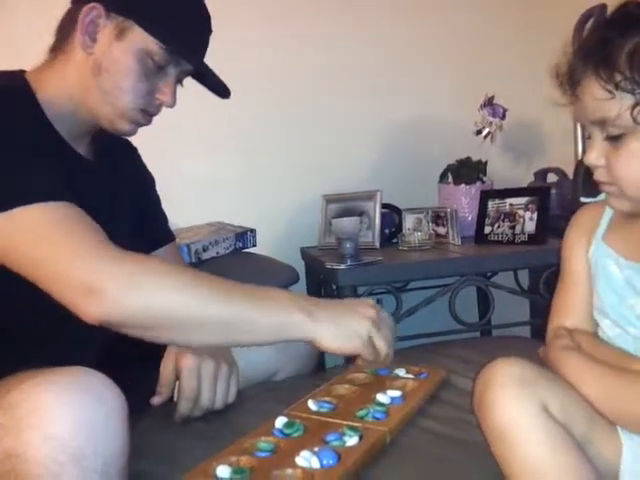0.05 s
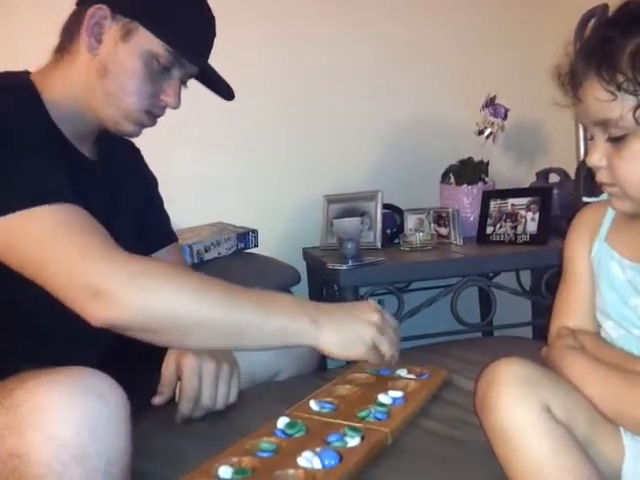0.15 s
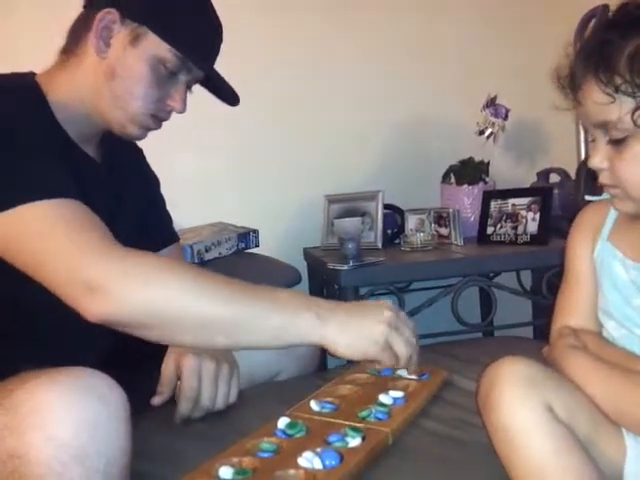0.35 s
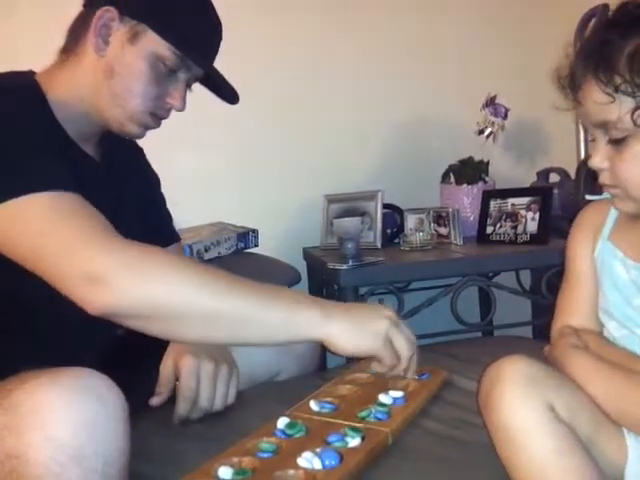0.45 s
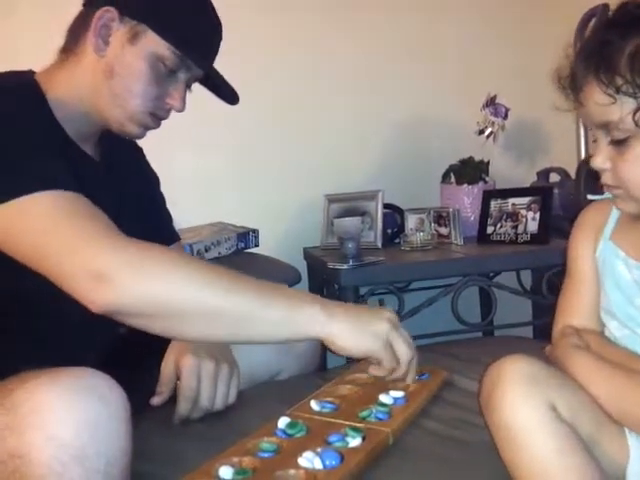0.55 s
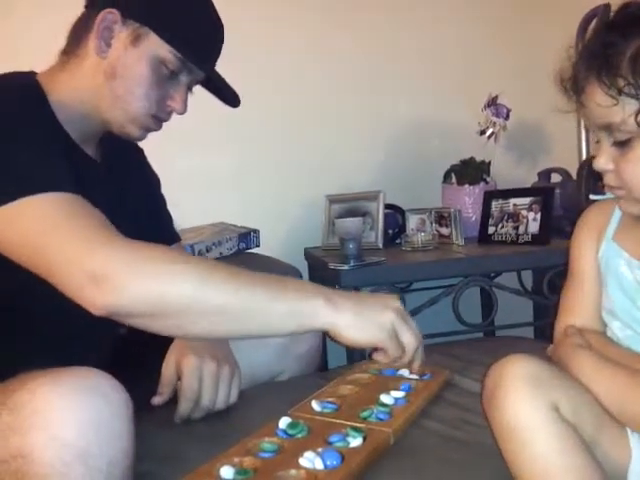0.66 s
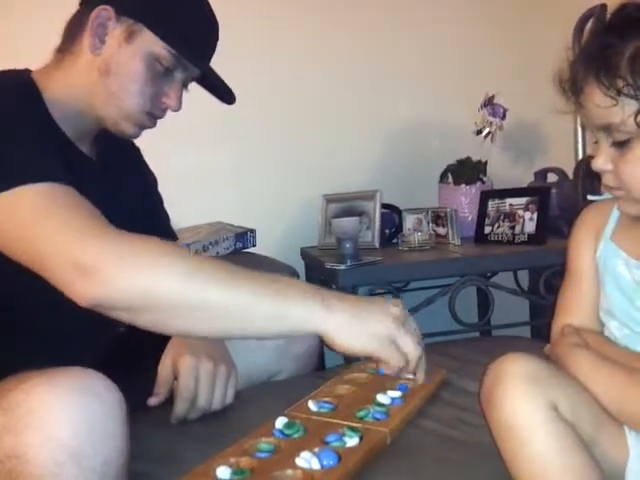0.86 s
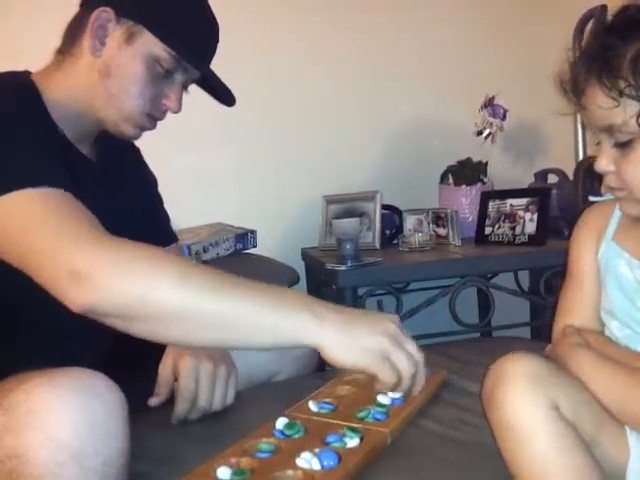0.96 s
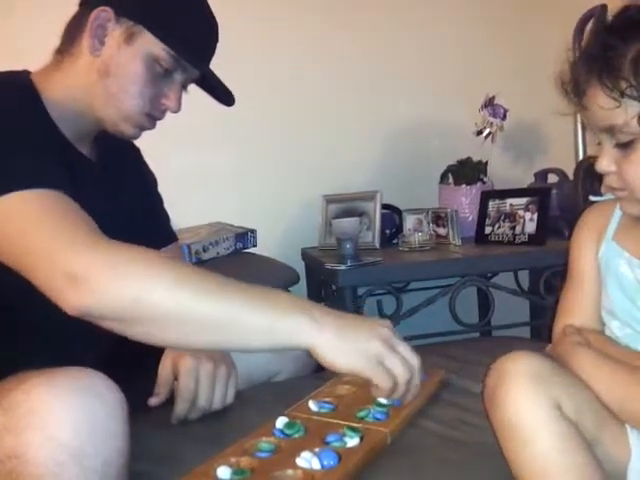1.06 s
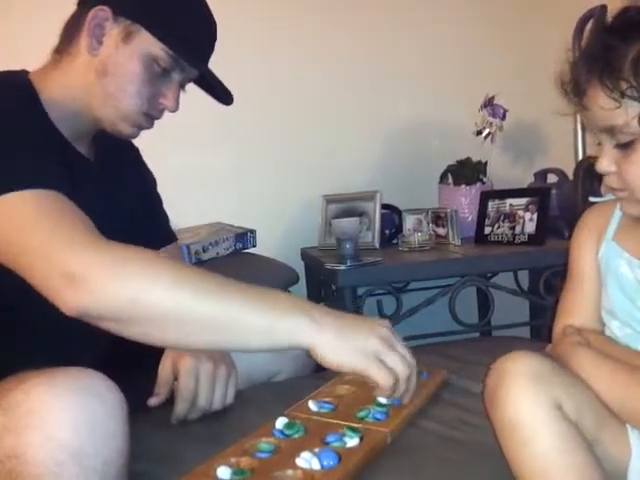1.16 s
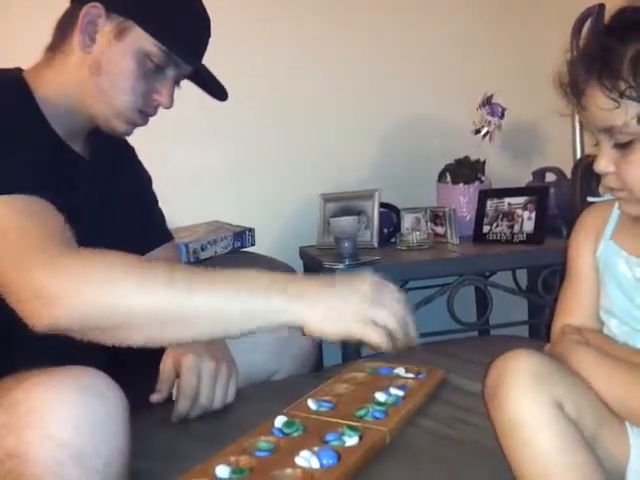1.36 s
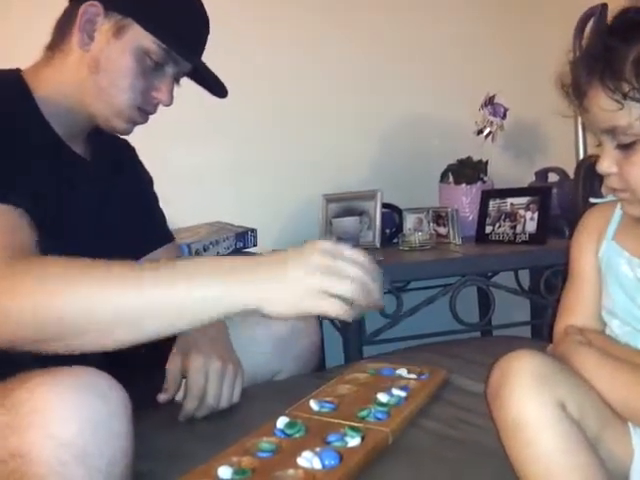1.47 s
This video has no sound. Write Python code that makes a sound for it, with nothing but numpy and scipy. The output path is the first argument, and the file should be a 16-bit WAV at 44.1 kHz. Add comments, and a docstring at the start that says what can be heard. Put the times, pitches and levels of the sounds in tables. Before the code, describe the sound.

Glass stones drop into the pits of a wooden game board in three quick clusters of clacks and clinks, with softer taps between. They are heard close by in a small quiet room with faint hum and hiss.

```python
"""In a small quiet room, glass stones are dropped one by one into the pits of a wooden board.
Each drop is a quick run of hits: the board knocks, the hollow of the pit clacks, and glass
meeting glass clinks with a sharp snap. Each of these is a few tones that fade very fast.
Between drops the stones tap softly. The room rings on briefly over a faint hum and hiss."""
import sys
import numpy as np
from scipy import signal
from scipy.fft import rfft, irfft
from scipy.io import wavfile

SR = 44100
rng = np.random.default_rng(int(sys.argv[2]) if len(sys.argv) > 2 else 0)


def transcribe(u):
    """Save the signal u as a 16-bit wav file named by the first command-line argument.

    u: samples, shape (n,) or (channels, n), limited to [-1, 1]; the rate is SR.
    q: integer samples, one column per channel.
    """
    v = np.clip(np.atleast_2d(u).T, -1, 1)
    q = np.round(v * 32767).astype(np.int16)
    wavfile.write(sys.argv[1], SR, q)


N = 66150


def from_db(db):
    """Turn decibels into a number to multiply a sound by."""
    return 10 ** (np.asarray(db) / 20)


def rms_one(x):
    """Scale a sound so that its average level (rms) is 1."""
    return x / np.sqrt(np.mean(x ** 2) + 1e-20)


def at_hz(table, hz, column=1):
    """Look up a table's value at any pitch, sliding smoothly between its rows."""
    table = np.array(table)
    return np.interp(np.log(np.maximum(hz, 1)), np.log(table[:, 0]), table[:, column])


def keep_part(x, hz, kind, order=4):
    """Keep the "low" part, the "high" part or one "band" of a sound."""
    return signal.sosfilt(signal.butter(order, hz, kind, fs=SR, output="sos"), x)


def add(out, start_s, sound):
    """Mix a sound in at its start time."""
    start = int(start_s * SR)
    out[start:start + len(sound)] += sound[:N - start]


def background():
    """Steady room noise and hiss, with a low hum: noise in bands so narrow that it wavers."""
    # how strong the steady noise is from low to high: pitch_hz, relative_db
    noise_shape = [(15, -54), (25, -32), (108, -9.5), (277, -11), (373, -11.5), (560, -20), (641, -16),
                   (1130, -23), (2350, -22), (2840, -24.5), (3620, -25.5), (16000, -31.5)]
    # the tones of the hum: pitch_hz, level_db, width_hz
    hum_tones = [(106.6, -57.5, 3.7), (192.5, -62, 5.7)]
    hz = np.arange(N // 2 + 1) * SR / N
    noise = irfft(rfft(rng.standard_normal(N)) * from_db(at_hz(noise_shape, hz)), N)
    out = from_db(-56) * rms_one(noise)
    for pitch_hz, level_db, width_hz in hum_tones:
        peak = 1 / (1 + ((hz - pitch_hz) / width_hz) ** 2)
        hum = irfft(rfft(rng.standard_normal(N)) * peak, N)
        out += from_db(level_db) * rms_one(hum)
    return out


def room_echo(sound):
    """Many reflections build up quickly, then each band of pitches fades at its own speed."""
    # the room's echo: pitch_hz, level_db, fade_s (time to fall by 60 dB)
    echo_bands = [(150, -3.5, 0.41), (500, -1.5, 0.43), (960, 1, 0.47), (1700, -4, 0.47), (2420, -6, 0.41),
                  (4180, 0, 0.39), (6220, -3, 0.42), (8950, 7.5, 0.31), (13700, -14.5, 0.47)]
    delay_s, build_s = 0.0017, 0.0078
    early_db, early_s = 4.5, 0.013   # the first reflections stand out above the rest
    t = np.arange(SR * 3 // 4) / SR
    onset = np.clip((t - delay_s) / build_s, 0, 1) * from_db(early_db * np.exp(-t / early_s))
    edges_hz = np.geomspace(100, 17000, 19)
    echo = 0
    for low, high in zip(edges_hz, edges_hz[1:]):
        hz = np.sqrt(low * high)
        noise = keep_part(rng.standard_normal(len(t)), [low, high], "band", order=3)
        tail = noise * onset * from_db(-60 * t / at_hz(echo_bands, hz, column=2))
        tail *= np.sqrt(2 * (high - low) / SR / np.sum(tail ** 2))   # bring the band to 0 dB
        echo += from_db(at_hz(echo_bands, hz)) * tail
    return signal.fftconvolve(sound, echo)[:N]


def ring(force, pitch_hz, fade_s):
    """One natural tone of an object: each push starts a sine wave that falls 60 dB in fade_s."""
    decay = from_db(-60 / (fade_s * SR))
    angle = 2 * np.pi * pitch_hz / SR
    return signal.lfilter([0, np.sin(angle)], [1, -2 * decay * np.cos(angle), decay ** 2], force + 1e-18)


def strike(tones, spread_db=2.5):
    """A stone hits and rattles as it settles, ringing an object's tones in a slightly random mix."""
    rattle_strength, rattle_s, contact_s = 0.12, 0.0021, 0.0034
    t = np.arange(SR // 20) / SR
    force = rattle_strength * rng.standard_normal(len(t)) * np.exp(-(t / rattle_s) ** 2)
    force[0] += 1   # the hit itself
    sound = 0
    for k, (pitch_hz, relative_db, fade_s) in enumerate(tones):
        gain = from_db(relative_db + spread_db * rng.standard_normal())
        sound += (-1) ** k * gain * ring(force, pitch_hz, fade_s)   # every second tone is flipped
    # as much energy as a sound of level 1 that lasts for contact_s
    return sound / np.sqrt(np.sum(sound ** 2) / (contact_s * SR))


def dropped_stones():
    """Every hit sounds board, pit and glass in its own mix and leaves the board ringing."""
    # the hits of the stones: start_s, board_db, pit_db, glass_db, snap_db
    hits = [ (0.2124, -26, -20, -25.5, -29), (0.2293, -25, -15, -32, -38), (0.2321, -26.5, -40, -26, -28.5),
            (0.2366, -20, -12.5, -30, -35), (0.2860, -28.5, -22.5, -33, -48),
            (0.6187, -19, -16, -36.5, -51.5), (0.6617, -20, -22, -34, -59), (0.6726, -26, -17.5, -19, -51),
            (0.6838, -53, -51, -30, -65), (0.7137, -26.5, -28, -40, -69), (0.7410, -30, -39, -46, -71),
            (0.758, -31.5, -41.5, -50.5, -70), (0.914, -37.5, -52.5, -60, -68), (0.964, -37, -43, -58, -58),
            (1.044, -40, -49, -61, -66), (1.05, -39.5, -52, -62, -70), (1.1240, -28, -33, -48, -66),
            (1.1765, -31, -47, -30, -43.5), (1.2025, -39.5, -16.5, -26.5, -30.5),
            (1.2166, -24, -26.5, -24.5, -43)]
    # tones of the board's knock, the pit's clack, the glass's clink and the high snap,
    # each with: pitch_hz, relative_db, fade_s
    board_tones = [(296, -19.5, 0.027), (491, -10, 0.0082), (1103, -1.5, 0.019), (1400, 4, 0.005),
                   (1798, 3, 0.016)]
    pit_tones = [(2330, -0.5, 0.012), (2580, 1, 0.0052), (3251, -9, .011), (4120, -14.5, 0.0056)]
    glass_tones = [(5075, -0.2, 0.0068), (5740, -3.8, 0.011), (6476, 1, 0.0047)]
    snap_tones = [(10510, -0.5, 0.002), (11850, -9, 0.012), (13460, 3.5, 0.0024)]
    # the board's longer ring: pitch_hz, relative_db (compared with the knock), fade_s
    lasting_tones = [(991.3, -26.5, 0.44), (1070, -34, 0.12), (1260, -18.5, 0.22), (1687, -32, 0.066),
                     (2318, -16.5, 0.14), (2490, -22, 0.23), (3170, -21, 0.21)]
    board_lag_s = 0.00029   # low waves that bend the board arrive a little late
    wood, glass, snap, blows = np.zeros((4, N))
    for start_s, board_db, pit_db, glass_db, snap_db in hits:
        add(wood, start_s + board_lag_s, from_db(board_db) * strike(board_tones))
        add(wood, start_s, from_db(pit_db) * strike(pit_tones))
        add(glass, start_s, from_db(glass_db) * strike(glass_tones))
        add(snap, start_s, from_db(snap_db) * strike(snap_tones))
        add(blows, start_s, from_db([board_db]))
    board_ring = sum(from_db(db) * ring(blows, hz, fade_s) for hz, db, fade_s in lasting_tones)
    body = keep_part(wood + glass + board_ring, hz=7650, kind="low", order=8)
    return body + keep_part(snap, hz=8000, kind="high", order=2)


def scene():
    """The stones heard from close by, with the room's echo, hum and hiss, in one channel."""
    stones = dropped_stones()
    return (stones + room_echo(stones) + background())[None]


def record(dry):
    """Cut away the very highest pitches steeply."""
    cutoff_hz = 16000
    return signal.sosfilt(signal.ellip(10, .3, 80, cutoff_hz, fs=SR, output="sos"), dry)


dry = scene()
out = record(dry)
transcribe(out)
```